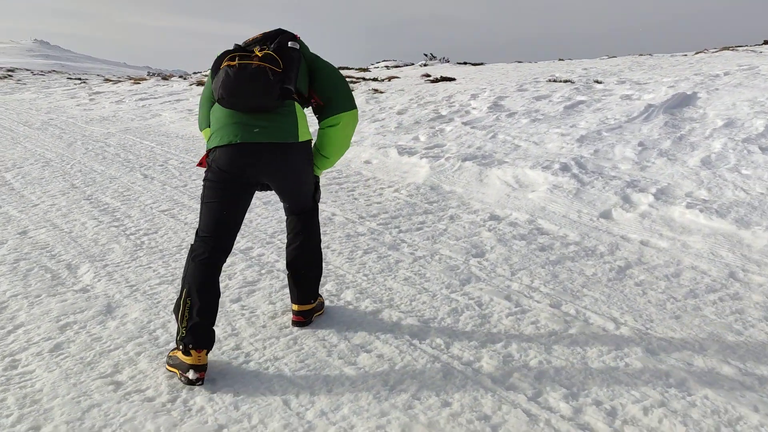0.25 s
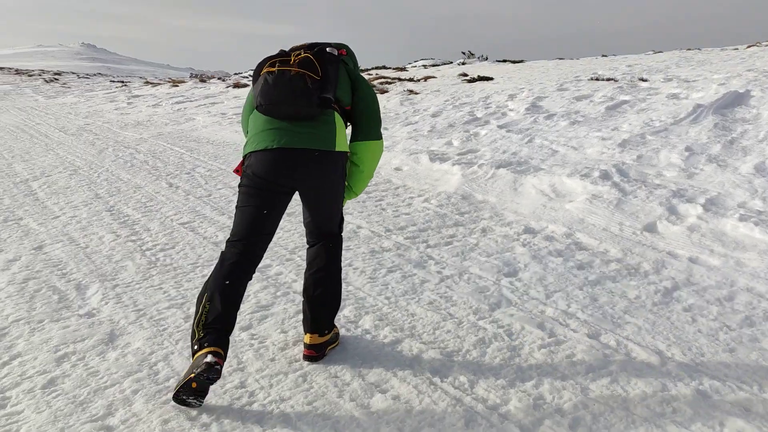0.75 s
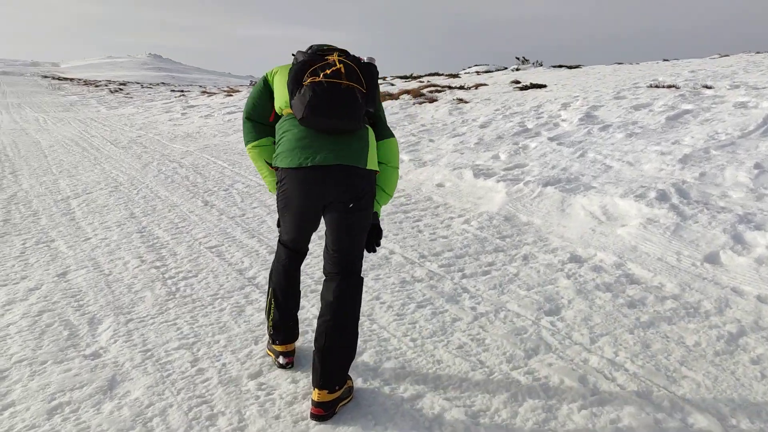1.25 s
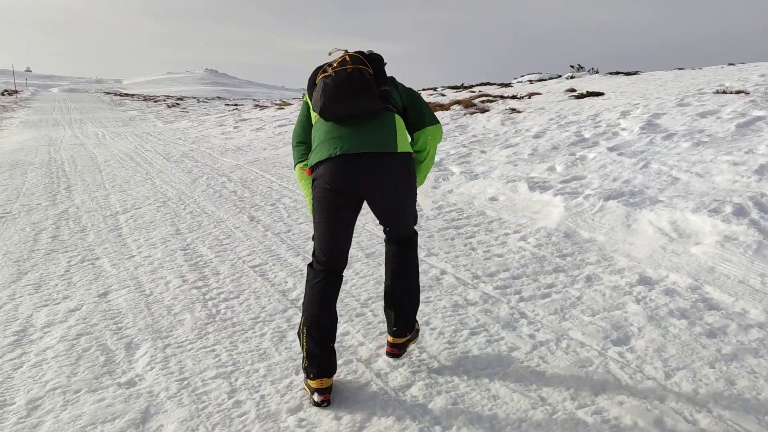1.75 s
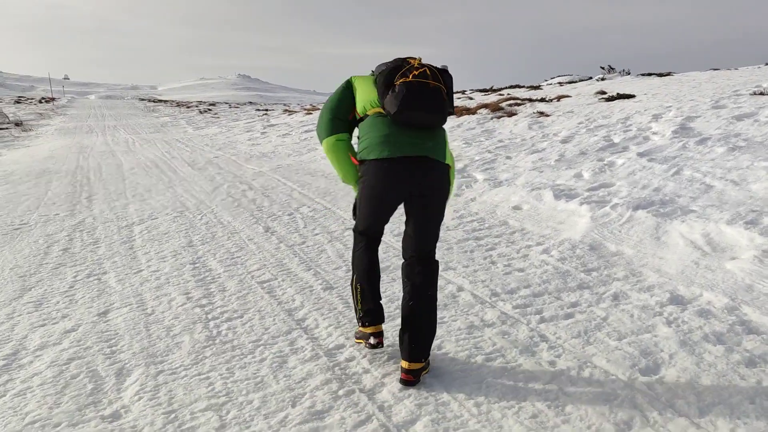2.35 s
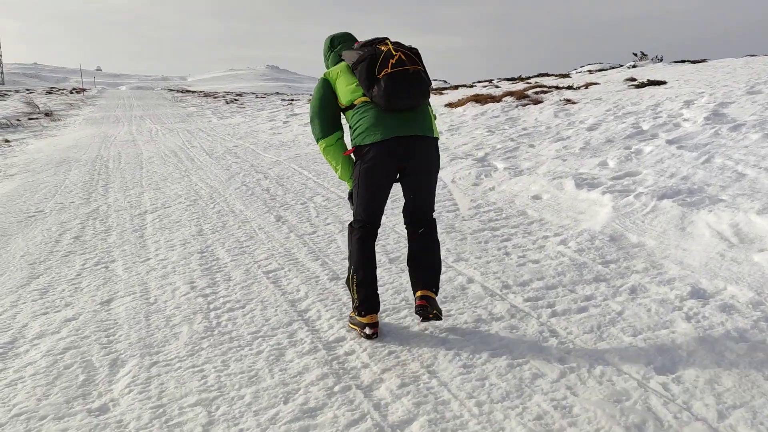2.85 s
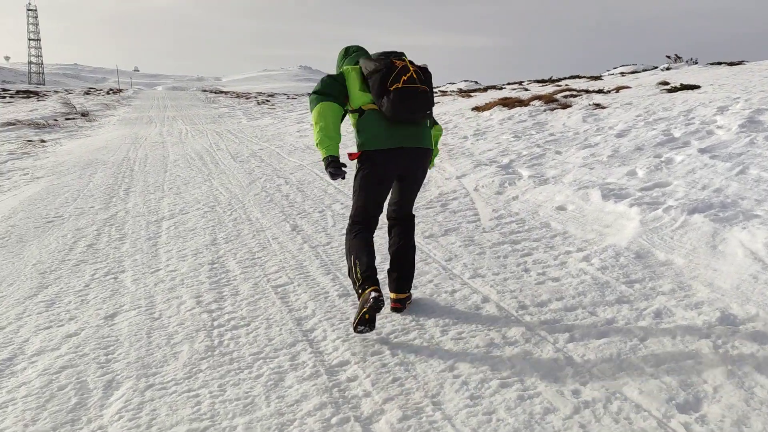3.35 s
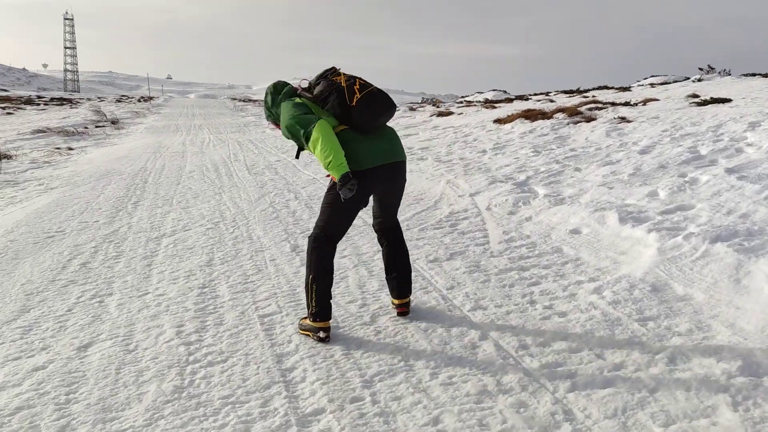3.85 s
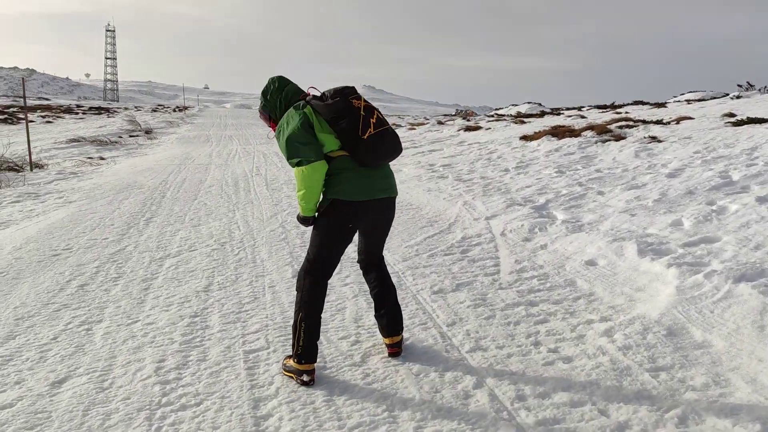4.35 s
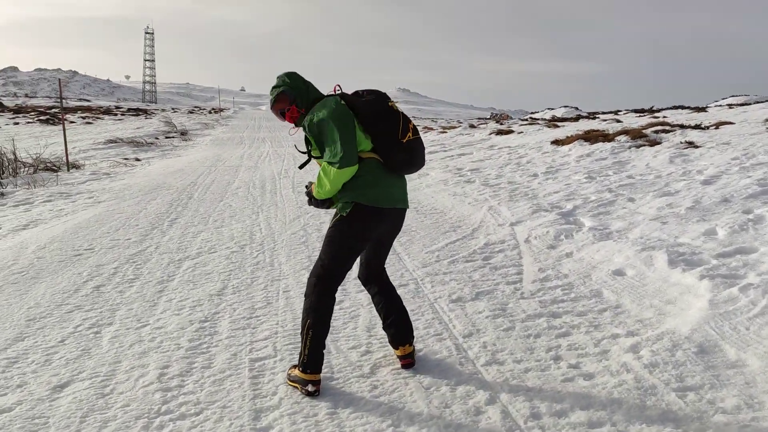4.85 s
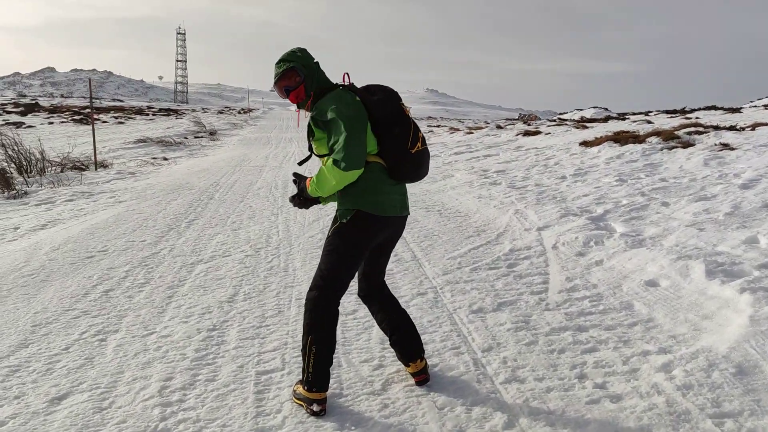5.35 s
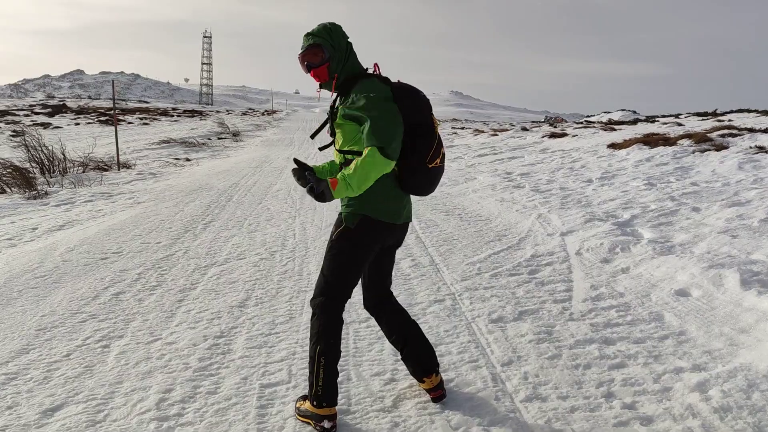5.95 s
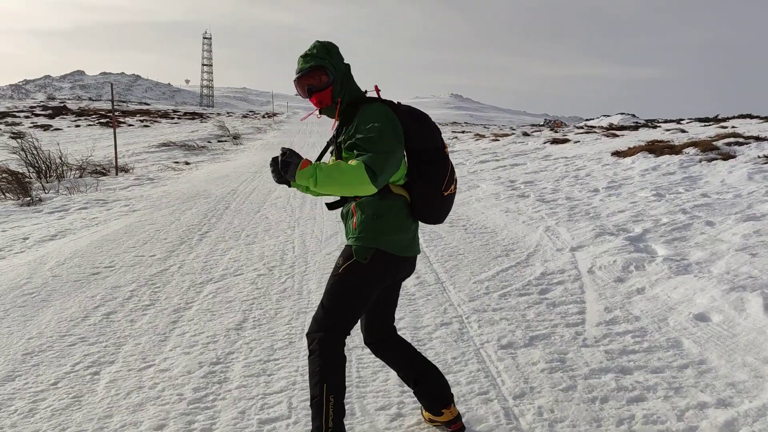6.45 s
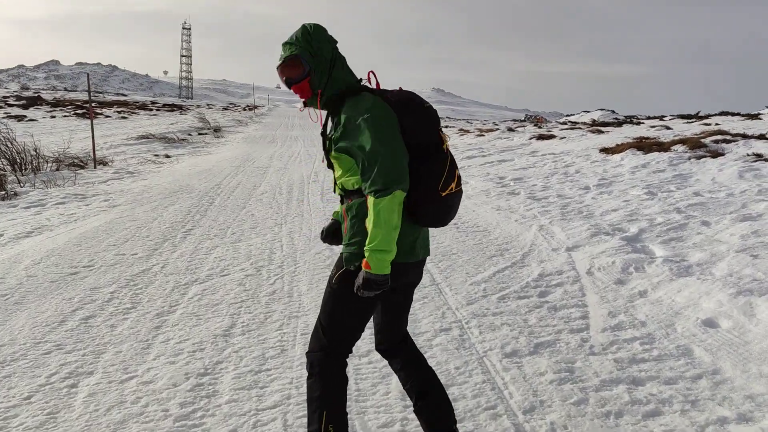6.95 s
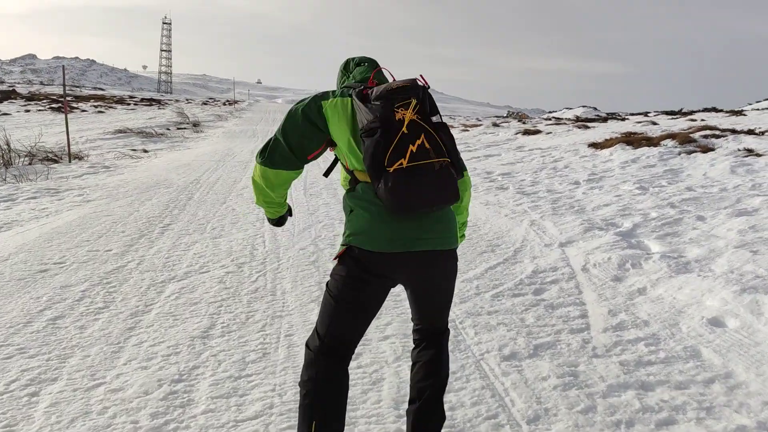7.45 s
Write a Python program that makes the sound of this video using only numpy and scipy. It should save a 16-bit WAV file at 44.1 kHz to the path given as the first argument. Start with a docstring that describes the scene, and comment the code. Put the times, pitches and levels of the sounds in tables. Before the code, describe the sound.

Strong wind buffets the microphone with a loud rumble and ragged gusts that gradually thin into a steadier rush.

```python
"""A gale on an open snow slope tears across a two-port microphone. It opens with ragged gusts driving the
right, windward capsule to its stops over a bright rush; the left port, in the lee, has its own lumpy
rumble and a thin cavity hiss. Snow grains tick on the lee port, hardest near 1.1 s. The gusts break up
into short slaps and thin out, leaving mostly rush and hiss by 6 s, until a last flurry at about 7.4 s."""
import sys
import numpy as np
from scipy import signal
from scipy.fft import rfft, irfft
from scipy.io import wavfile

SR = 44100
rng = np.random.default_rng(int(sys.argv[2]) if len(sys.argv) > 2 else 0)


def to_wav(s):
    """Save 16-bit WAV."""
    ch = np.atleast_2d(s).T  # columns
    pcm = np.round(np.clip(ch, -1, 1) * 32767)  # PCM
    wavfile.write(sys.argv[1], SR, pcm.astype(np.int16))


N = 338688
STEP = 20   # samples per step of the slow controls
STEP_S = np.arange(N // STEP + 2) * STEP / SR
BIN_HZ = np.maximum(np.fft.rfftfreq(N, 1 / SR), 1)

# Blasts straight into the windward port: start_s, length_s, level_db
BLASTS = [(0, 0.027, -20), (0.042, 0.6, -20), (0.092, 0.13, -16), (0.38, 0.061, -17.5),
          (0.553, 0.029, -15.5), (0.663, 0.084, -17.5), (0.789, 0.049, -20.5), (0.847, 0.33, -23),
          (0.878, 0.13, -18), (1.202, 0.037, -29.5), (1.252, 0.17, -27), (1.3, 0.093, -22),
          (1.415, 0.047, -16.5), (1.485, 0.057, -22), (1.556, 0.032, -23.5), (1.609, 0.051, -25),
          (1.707, 0.018, -25.5), (1.751, 0.011, -20.5), (1.781, 0.027, -19), (1.846, 0.036, -19.5),
          (1.888, 0.048, -30), (1.951, 0.019, -32.5), (1.986, 0.023, -25), (2.044, 0.013, -26.5),
          (2.087, 0.11, -24.5), (2.12, 0.018, -20.5), (2.256, 0.0086, -24.5), (2.319, 0.014, -26),
          (2.362, 0.061, -17.5), (2.415, 0.063, -25.5), (2.491, 0.13, -21), (2.639, 0.073, -24),
          (2.747, 0.075, -24.5), (2.833, 0.044, -26), (2.878, 0.027, -23), (2.924, 0.067, -22),
          (3.001, 0.034, -41), (3.079, 0.0066, -24), (3.107, 0.025, -21.5), (3.163, 0.016, -29.5),
          (3.325, 0.058, -30), (3.388, 0.064, -26.5), (3.468, 0.02, -32), (3.478, 0.0092, -21.5),
          (3.515, 0.0088, -22.5), (3.56, 0.057, -24), (3.694, 0.0084, -38), (3.753, 0.008, -29),
          (3.775, 0.023, -23), (3.806, 0.044, -20), (4.01, 0.0067, -20.5), (4.108, 0.045, -33),
          (4.128, 0.018, -20.5), (4.194, 0.019, -24), (4.279, 0.011, -39), (4.394, 0.045, -35),
          (4.404, 0.013, -20.5), (4.514, 0.022, -36), (4.726, 0.011, -26), (5.057, 0.038, -19.5),
          (5.224, 0.024, -33.5), (5.258, 0.014, -24), (5.277, 0.016, -21), (5.319, 0.014, -31.5),
          (5.694, 0.017, -33), (5.727, 0.01, -25), (7.362, 0.096, -25), (7.396, 0.022, -22),
          (7.49, 0.035, -23.5), (7.61, 0.031, -25.5)]
FULL_BLAST_DB = -20   # the blast, snap or puff level that counts as force 1
# Single hard eddies snapping on the windward port: start_s, level_db
EDDY_SNAPS = [(0.7878, -16), (0.8666, -22), (2.024, -22), (2.267, -15.5), (2.3586, -24), (2.411, -12),
              (2.7244, -15.5), (2.7591, -22), (3.017, -26), (3.068, -21), (3.1046, -24), (3.486, -21.5),
              (3.543, -36), (4.373, -23.5), (4.866, -18.5), (4.887, -28), (5.122, -20.5), (5.428, -31),
              (5.732, -24.5), (6.035, -29), (6.666, -26.5), (6.911, -25), (7.567, -26)]
# Tone of a blast at force 1: frequency_hz, relative_db
BLAST_TONE = [(22, 21.5), (100, 16.5), (300, 10), (1000, 5), (3000, -4.5), (6800, -12.5), (8500, -16.5),
              (15000, -26)]
# Faster air carries finer eddies, so weak blasts are dull: frequency_hz, db_per_blast_db
BLAST_GROWTH = [(80, 0.18), (300, 0.45), (1500, 0.56), (5000, 1.2), (12000, 2.5)]
# Tone of the wind bed on the windward port: frequency_hz, density_db
WINDWARD_TONE = [(22, -34.5), (60, -37), (110, -37), (200, -44.5), (450, -48), (900, -57), (2000, -73.5),
                 (4000, -88), (6500, -86.5), (15000, -102)]
# Swells of the wind between the blasts: time_s, hiss_db
WINDWARD_SWELLS = [(1.7, 1.5), (3.0, -6), (3.25, -1), (3.9, -8.5), (4.5, 0), (4.9, 0.5), (5.3, 2.5),
                   (5.6, 5), (5.9, -4), (6.05, 3), (6.5, 4.5), (6.8, -0.5), (7.3, 6), (7.68, 0.5)]
# Tone of the wind bed on the lee port: frequency_hz, density_db
LEE_TONE = [(22, -29), (60, -30.5), (110, -31.5), (200, -40.5), (400, -53), (900, -65.5), (2000, -75.5),
            (4500, -92), (7000, -94), (15000, -108)]
# Swells of the wind in the lee: time_s, rush_db, hiss_db
LEE_SWELLS = [(0.0, -2.5, -1), (0.68, 2, 2), (0.88, -4, -2), (1.07, 0.5, 0), (1.5, 0.5, -5), (1.9, 7, 0.5),
              (2.35, 2, -1.5), (2.6, 8.5, -1), (2.85, -3, -7), (3.15, 2.5, 3.5), (3.4, -2, -3),
              (3.6, 6, -6), (4.0, -1.5, -5.5), (4.9, -2.5, -4.5), (5.3, -1, 2.5), (5.8, 0.5, -6),
              (6.2, 1.5, 0.5), (6.65, 3.5, -5), (6.9, -0.5, -2), (7.15, 4.5, 1), (7.68, -1.5, -4.5)]
# Where the three registers of the wind sit: rumble_hz, rush_hz, hiss_hz
REGISTERS_HZ = [90, 700, 5000]
# Snow grains hitting the lee port: start_s, relative_db
SNOW_HITS = [(0.166, -34), (0.904, -47.5), (1.079, -13), (1.189, -31), (1.825, -31.5), (2.965, -31.9),
             (4.187, -38.4), (5.917, -19), (6.661, -30), (6.941, -25), (7.175, -27)]
# How far each capsule can move, lee then windward: travel_full_scale
CAPSULE_TRAVEL = [
    [.88],
    [.82],
]
# How abruptly that travel ends, lee then windward: knee_exponent
CAPSULE_KNEE = [
    [5],
    [2.7],
]
# Treble loss on the windward side: frequency_hz, gain_db
WINDWARD_TREBLE = [(6800, -1.5), (8300, -15.5), (10000, -11), (13000, -6.5), (16000, -6)]


def gusts(wind_db):
    """Broad turbulence jumps up and dies away with each blast, torn up by fast eddies."""
    force, snaps = np.zeros((2, len(STEP_S)))
    for start_s, length_s, level_db in BLASTS:
        blowing = (STEP_S >= start_s) & (STEP_S < start_s + length_s)
        force = np.maximum(force, blowing * from_db(level_db - FULL_BLAST_DB))
    rise_s, fall_s, snap_s = 0.013, 0.0061, 0.0028
    for start_s, level_db in EDDY_SNAPS:
        snaps[round(start_s * SR / STEP)] = from_db(level_db - FULL_BLAST_DB) * snap_s * SR / STEP
    edge = np.hanning(round(rise_s * SR / STEP))
    force = np.convolve(force + puffs(wind_db), edge / edge.sum(), "same")
    force = np.maximum(force, fading(force, fall_s))
    force = force * tearing(force) + fading(snaps, snap_s)
    return by_octaves(BLAST_TONE, lambda hz: from_db(-49) * force ** at_hz(BLAST_GROWTH, hz))


def tearing(force):
    """Fast eddies shred the level of a blast; strong blasts fill their own gaps."""
    eddies = drift(200)
    depth_db = 3.5 / (1 + 1.18 * force ** 2)
    spikes = 0.2 * (eddies ** 2 - 1)   # peaks stand out more than dips
    return from_db(depth_db * (0.64 * drift(62) + eddies + spikes))


def puffs(wind_db, per_s=8, spread_db=3.5, decay_s=0.0077):
    """The force of faint blasts that land at random and grow with the wind."""
    born = rng.random(len(STEP_S)) < per_s * STEP / SR
    level_db = -42.5 - FULL_BLAST_DB + wind_db + spread_db * rng.standard_normal(len(STEP_S))
    return fading(born * from_db(level_db), decay_s) * decay_s * SR / STEP


def windward_rush(wind_db):
    """The bright wind bed: pressure goes partly with air speed squared, so strong eddies spike."""
    air = turbulence(WINDWARD_TONE, swell_db=[0.15 * wind_db, 0.7 * wind_db, wind_db],
                     lump_db=[0.8, 3.0, 1.2], lump_hz=29, flicker_db=1.05, wander_db=0.37)
    return air + air * np.abs(air)


def lee_rumble():
    """Lumpy turbulence on the sheltered port; its low end barely follows the swells."""
    rush_db, hiss_db = in_time(LEE_SWELLS)
    return turbulence(LEE_TONE, swell_db=[0.1 * rush_db, rush_db, hiss_db],
                      lump_db=[1.5, 3.5, 1.5], lump_hz=43, flicker_db=1.5, wander_db=1.27)


def turbulence(tone, swell_db, lump_db, lump_hz, flicker_db, wander_db):
    """Bands swell with the wind; passing eddies lump them together, and each also wavers alone."""
    eddies = drift(lump_hz)

    def gain_at(hz):
        register_shares = [at_hz(np.c_[REGISTERS_HZ, one], hz) for one in np.eye(3)]
        eddy_db = at_hz(np.c_[REGISTERS_HZ, lump_db], hz) * eddies
        own_db = wander_db * drift(1.54) + flicker_db * drift(13.5)
        return from_db(np.dot(register_shares, swell_db) + eddy_db + own_db)
    return by_octaves(tone, gain_at)


def cavity(sound, centre_hz=7200, width_hz=1400):
    """The air in the lee port adds one broad resonance, heard as a thin hiss."""
    radius, angle = np.exp(-np.pi * width_hz / SR), 2 * np.pi * centre_hz / SR
    feedforward = np.array([1, 0, -1]) * (1 - radius ** 2) / 2
    ringing = signal.lfilter(feedforward, [1, -2 * radius * np.cos(angle), radius ** 2], sound)
    return sound + from_db(13) * ringing


def snow_grains(faint_per_s=8, decay_s=0.0007, lowpass_hz=7500):
    """Each grain ticks with a tiny burst of dulled noise; fainter ones fall at random."""
    hits = (rng.random(N) < faint_per_s / SR) * from_db(-54 + 3.7 * rng.exponential(1, N))
    for start_s, relative_db in SNOW_HITS:
        hits[round(start_s * SR)] = from_db(relative_db)
    envelope = signal.lfilter([1], [1, -np.exp(-1 / (decay_s * SR))], hits + 1e-18)
    bursts = envelope * rng.standard_normal(N)
    return from_db(-5.5) * signal.lfilter(*signal.butter(2, lowpass_hz, fs=SR), bursts)


def by_octaves(tone, gain_at):
    """Noise shaped to a tone curve, each octave band riding its own fader."""
    spectrum = rfft(rng.standard_normal(N)) * from_db(at_hz(tone, BIN_HZ)) * np.sqrt(SR / 2)
    mix = np.zeros(N)
    for hz in 32 * 2 ** np.arange(10):
        octaves_away = np.clip(np.log2(np.maximum(BIN_HZ, 32) / hz), -1, 1)
        band = irfft(spectrum * np.cos(np.pi / 2 * octaves_away) ** 2, N)
        mix += band * np.interp(np.arange(N) / STEP, np.arange(len(STEP_S)), gain_at(hz))
    return mix


def drift(rate_hz):
    """A random modulator with spread 1: noise twice through a one-pole low-pass."""
    pole = np.exp(-2 * np.pi * STEP * rate_hz / SR)
    noise = rng.standard_normal(len(STEP_S) + 2000)
    slow = signal.lfilter([1], [1, -2 * pole, pole * pole], noise)[2000:]
    return slow / np.std(slow)


def fading(control, decay_s):
    """Gives a slow control a tail with a one-pole low-pass."""
    pole = np.exp(-STEP / (decay_s * SR))
    return signal.lfilter([1 - pole], [1, -pole], control)


def in_time(rows):
    """Reads the columns of a swell curve at the control steps."""
    time_s, *columns = np.transpose(rows)
    return [np.interp(STEP_S, time_s, column) for column in columns]


def at_hz(points, hz):
    """Reads a curve on a log-frequency axis."""
    frequency_hz, values = np.transpose(points)
    return np.interp(np.log(hz), np.log(frequency_hz), values)


def from_db(db):
    """Decibels to gain."""
    return 10 ** (np.asarray(db) / 20)


def scene():
    """Lee left, windward right. The ports share nothing: eddies are smaller than their spacing."""
    wind_db, = in_time(WINDWARD_SWELLS)
    lee, windward = lee_rumble(), windward_rush(wind_db)
    return np.array([cavity(lee + snow_grains()), windward + gusts(wind_db)])


def record(dry):
    """The capsules hit their stops, the vent lets flat tops sag, and the windward side loses treble."""
    vent_hz, top_cut_hz = 8, 16150
    knee = np.array(CAPSULE_KNEE)
    held = dry / (1 + np.abs(dry / CAPSULE_TRAVEL) ** knee) ** (1 / knee)
    vented = signal.lfilter(*signal.butter(1, vent_hz, "high", fs=SR), held)
    treble_db = at_hz([(5000, 0)] + WINDWARD_TREBLE, BIN_HZ)   # flat up to 5 kHz
    vented[1] = irfft(rfft(vented[1]) * from_db(treble_db), N)
    clipped = np.clip(vented, -0.97, 0.97)
    return signal.sosfilt(signal.cheby2(18, 60, top_cut_hz, fs=SR, output="sos"), clipped)


dry = scene()
out = record(dry)
to_wav(out)
```